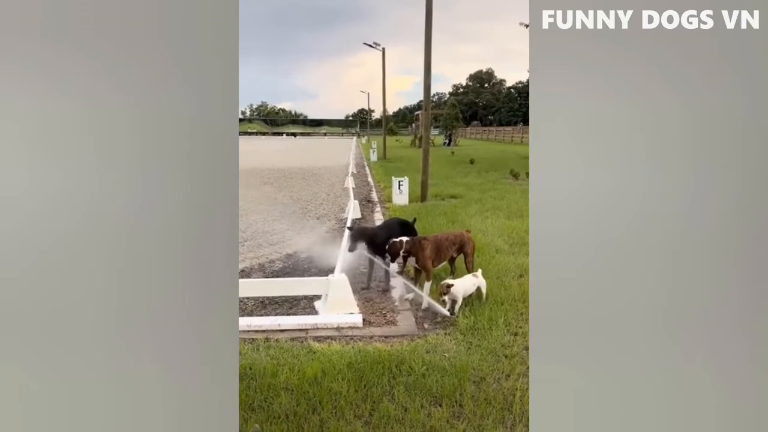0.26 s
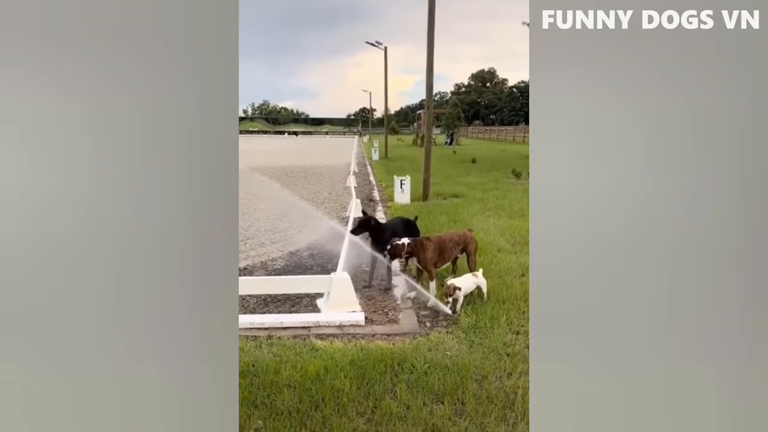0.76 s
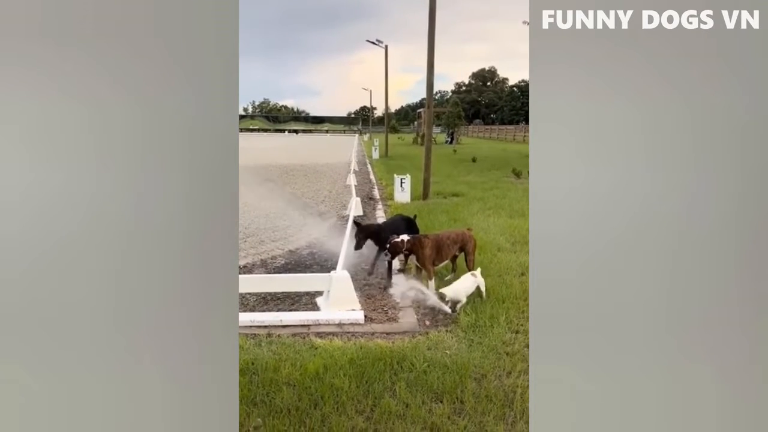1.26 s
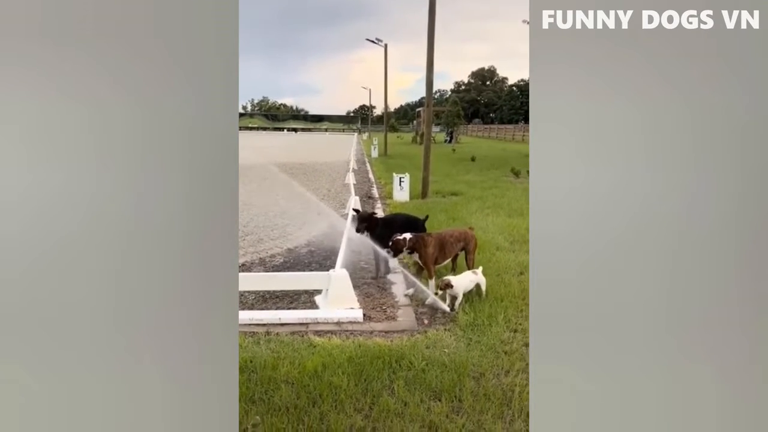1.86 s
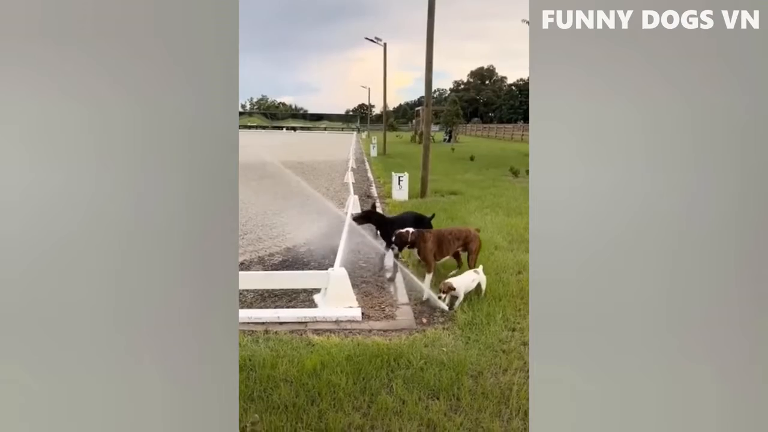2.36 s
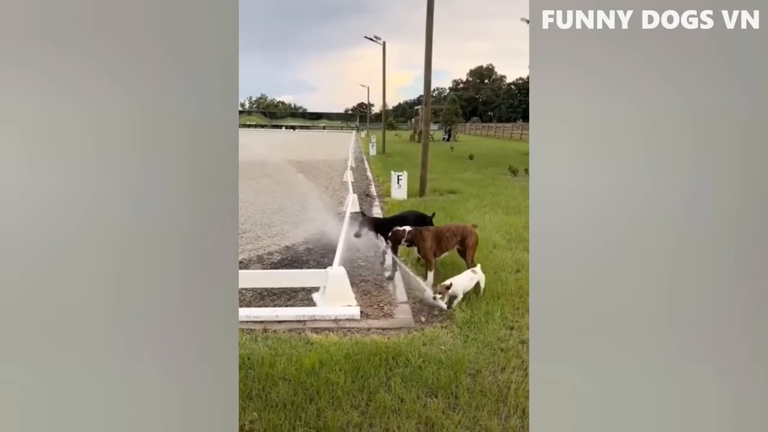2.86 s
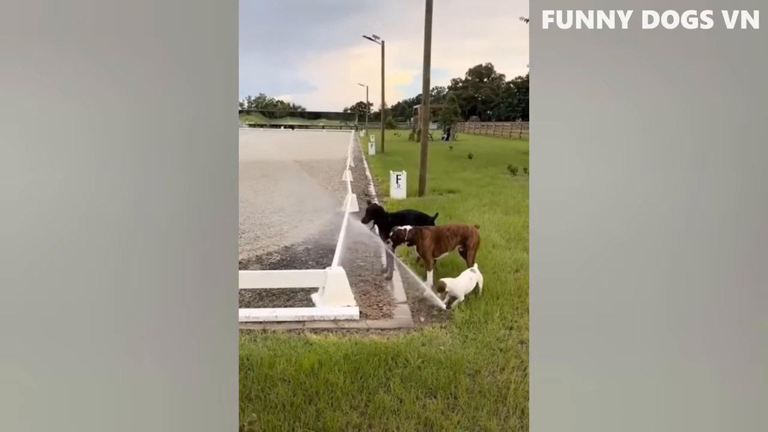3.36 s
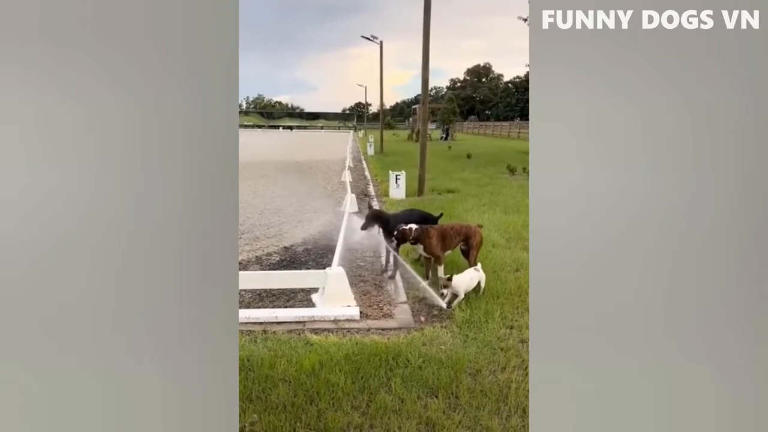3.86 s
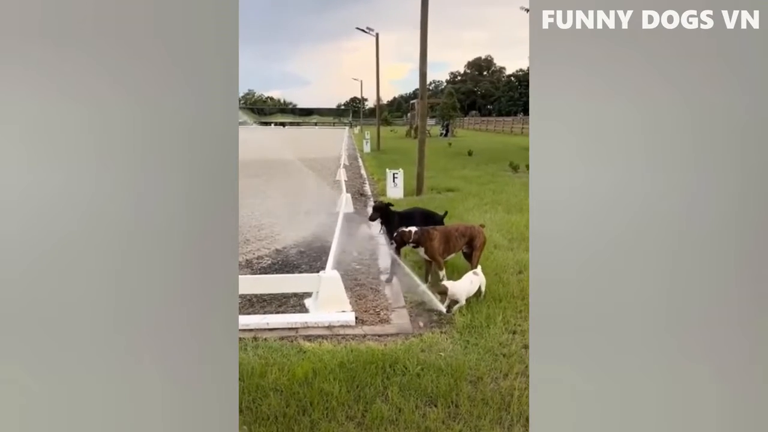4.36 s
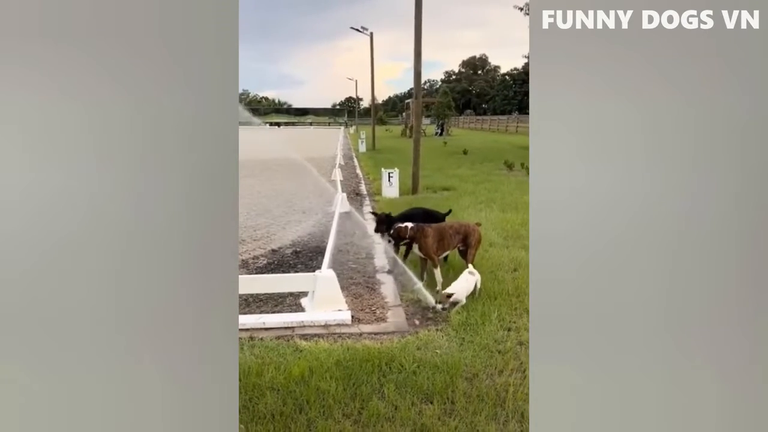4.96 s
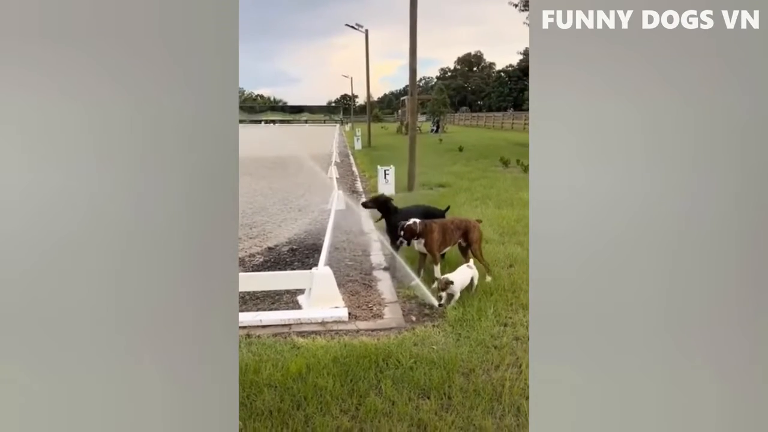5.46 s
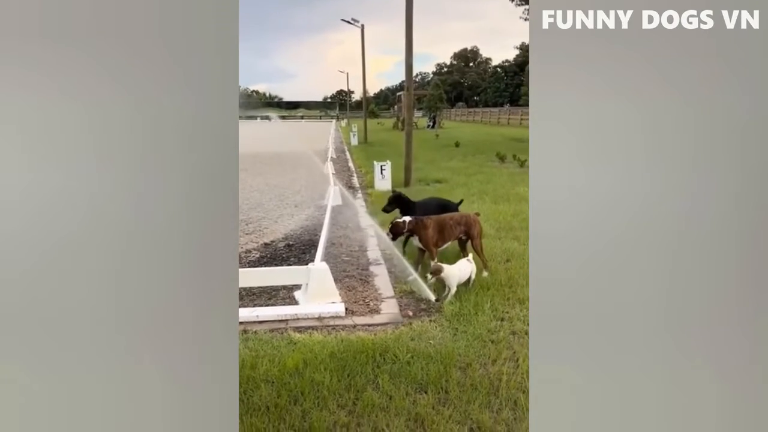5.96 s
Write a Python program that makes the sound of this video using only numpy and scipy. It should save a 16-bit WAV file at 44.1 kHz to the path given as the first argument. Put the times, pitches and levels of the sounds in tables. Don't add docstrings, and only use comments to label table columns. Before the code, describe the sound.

Outdoors on a lawn, a sprinkler a few metres from a phone spits irregular rasping bursts of water. Soon dogs bite the jet, turning the hiss into hollow, mouth-shaped gushes. Sharp slaps, fine sprays and small gulped bubbles crowd in between. Low distant traffic and soft falling spray continue underneath. Near the end come a long bite, a muffled gush, a faint deep paw thump and a final bright burst. The treble is thin and brittle, with small whistles.

```python
import sys
import numpy as np
from scipy import signal
from scipy.fft import rfft, irfft, next_fast_len
from scipy.io import wavfile
from scipy.ndimage import uniform_filter1d, map_coordinates

SR = 44100
rng = np.random.default_rng(int(sys.argv[2]) if len(sys.argv) > 2 else 0)


def inscribe(sig):
    pcm = np.round(np.clip(np.atleast_2d(sig).T, -1, 1) * 32767)
    wavfile.write(sys.argv[1], SR, pcm.astype(np.int16))


def ratio(d):
    e = np.asarray(d, float) / 20
    return 10 ** e


N = 274081
HOP = 32


def unit(x):
    return x / np.sqrt(np.mean(x ** 2) + 1e-20)


def along(points, hz):
    f, v = np.transpose(points)
    return np.interp(np.log(hz + 1), np.log(f + 1), v)


def wobble(rate):
    knots = rng.standard_normal(int(N * rate / SR) + 4)
    return map_coordinates(knots, [np.arange(N) * rate / SR])


def filtered(x, response):
    m = next_fast_len(N + 8192)
    return irfft(rfft(x, m) * response(np.fft.rfftfreq(m, 1 / SR)), m)[..., :N]


def colour(points):
    return lambda hz: ratio(along(points, hz))


def rush(gain, alike, patchy_db, spiky_db):
    drops = ratio(spiky_db * uniform_filter1d(rng.standard_normal(N), size=9) * 3)
    z = signal.stft(rng.standard_normal((2, N)) * drops, nperseg=256)[2]
    patches = uniform_filter1d(rng.standard_normal(z.shape[1:]), size=2, axis=0)
    patches = uniform_filter1d(patches, size=14, axis=1)
    pair = signal.istft(z * ratio(patchy_db * unit(patches)), nperseg=256)[1][:, :N]

    def mid_side_gain(hz):
        spread = np.arccos(np.clip(along(alike, hz), -1, .97)) / 2
        return gain(hz) * [np.cos(spread), np.sin(spread)]

    mid, side = filtered(pair, mid_side_gain)
    return unit(np.array([mid + side, mid - side]))


# f/Hz, level/dB [per Hz]
DISTANT = [(18, -41), (38, -10.5), (56, -2.5), (92, -3.5), (125, -7.5), (240, -10), (450, -20), (900, -21),
           (1500, -24), (3400, -22), (3900, -19), (5700, -22), (6300, -64)]
# f/Hz, level/dB [per Hz]
MIST = [(5700, -60), (6100, -3.5), (8000, -1.5), (11000, -2), (13000, 2.5), (15300, 0), (16200, -80)]
# f/Hz, likeness [0-1]
FAR_ALIKE = [(60, 0.92), (180, 0.95), (550, 0.82), (1650, 0.76), (4970, 0.096), (15000, 0.15)]
# t/s, level/dB
PASSING = [(0, 1), (1.1, .5), (1.8, 0.5), (2.5, 0.5), (4.2, 1), (4.8, 0), (5.1, -3), (5.45, 2.5),
           (5.75, -1.5), (6.21, 0.5)]


def distance():
    swell_db = np.interp(np.arange(N) / SR, *np.transpose(PASSING))
    far = ratio(-42 + swell_db) * rush(colour(DISTANT), FAR_ALIKE, patchy_db=1.82, spiky_db=1.5)
    mist_db = -45.5 + 1.2 * swell_db + 0.54 * wobble(4.3)
    return far + ratio(mist_db) * rush(colour(MIST), FAR_ALIKE, patchy_db=-0.5, spiky_db=3.5)


# t/s, f/Hz, level/dB, t60 [s]
GULPS = [
    (.738, 206, -44.5, 0.054),
    (1.063, 183, -35, 0.058),
    (1.38, 285, -35.5, 0.033),
    (3.563, 366, -34, 0.046),
    (4.09, 790, -32, 0.099),
    (4.65, 700, -50, .05),
    (5.673, 1650, -38, 0.038),
    (5.857, 62, -41.5, 0.21),
]


def gulps():
    out, t = np.zeros(N + SR), np.arange(SR // 5) / SR
    for s, hz, db, t60 in GULPS:
        ring = np.sin(2 * np.pi * hz * t * (1 + 0.117 * t / t60))
        ring = ring * (1 - np.exp(-t / 0.0033))
        out[round(s * SR):][:len(t)] += ratio(db + 12.5 - 60 * t / t60) * ring
    return out[:N]


# t/s, peak level/dB, low body level/dB
SLAPS = [(0.7297, -41, -25), (1.4444, -15, -21), (1.5989, -15, -35), (1.6442, -18, -26), (1.9346, -38, -26),
         (2.338, -31, -14), (2.489, -26, -26), (2.804, -27, -22), (2.9433, -26, -9), (3.1764, -22, -26),
         (3.2037, -17, -27), (3.5, -31, -27), (3.6174, -26.5, -18), (4, -24, -15), (4.2994, -31, -23),
         (4.8543, -24, -19), (5.2464, -26, -21), (5.913, -22, -31), (6.032, -32, -24)]


def slaps():
    out, t = np.zeros(N + SR), np.arange(2000) / SR
    for s, db, low_db in SLAPS:
        burst = rng.standard_normal((2, len(t)))
        spatter = ratio(-60 * t / 0.0075) * burst[0]
        body = 3 * ratio(low_db - 60 * t / 0.014) * uniform_filter1d(burst[1], size=16)
        out[round(s * SR):][:len(t)] += ratio(db - 5.5) * (spatter + body)
    return filtered(out[:N], colour([(100, 5), (300, 2.7), (5000, 5.4), (15000, 6.9)]))


# start t/s, end t/s, f/Hz, width [Hz], level/dB
CAVITIES = [(.37, 0.596, 1030, 258, -33.5), (0.491, 0.655, 1880, 320, -33), (0.424, .56, 2830, 500, -31.5),
            (0.169, 0.262, 3270, 700, -35.5), (1.441, 1.502, 1110, 200, -34.5),
            (1.445, 1.548, 5260, 600, -37), (1.648, 1.733, 2570, 250, -41), (2.336, 2.514, 1730, 260, -37),
            (2.353, 2.519, 2550, 220, -34), (2.823, 2.896, 3430, 350, -47), (3.103, 3.17, 1100, 180, -34),
            (3.292, 3.314, 2530, 250, -32), (3.498, 3.557, 1700, 250, -38), (3.878, 3.955, 1097, 150, -36),
            (4.019, 4.137, 920, 380, -43), (4.231, 4.327, 2890, 300, -32), (5.243, 5.277, 1580, 250, -37),
            (5.428, 5.52, 1050, 420, -32), (5.472, 5.53, 3040, 250, -37), (5.668, 5.724, 510, 596, -38.5),
            (5.69, 5.83, 3370, 70, -56), (5.716, 5.798, 2750, 70, -52), (5.698, 5.827, 1720, 405, -51)]


def cavities():
    out, sputter = np.zeros((2, N)), ratio(1.5 * wobble(30))
    for start, end, hz, width_hz, db in CAVITIES:
        n = round((end - start) * SR)
        f = np.fft.rfftfreq(n, 1 / SR)
        resonance = (f * width_hz / (hz * hz - f * f + 1j * f * width_hz)) ** 1.7
        spray = rng.standard_normal((2, 16000))[:, :n]
        ring = irfft(rfft(spray) * resonance, n)
        mid, side = unit(ring) * signal.windows.tukey(n, .35) * [[1], [.2]]
        out[:, round(start * SR):][:, :n] += ratio(db) * np.array([mid + side, mid - side])
    return out * sputter


# f/Hz, width [Hz], level/dB
MOUTH = [(700, 300, -4.5), (1015, 310, 0.5), (1760, 440, -1), (2730, 260, -6.5)]


def mouth(f):
    total = 0
    for k, (centre, width, db) in enumerate(MOUTH):
        band = 1j * f * width
        total = total + (-1) ** k * ratio(db) * band / (centre * centre - f * f + band)
    return total


def contacts(rows, release_db, crown_db, drain_db, fizz_db, grow_db):
    s, hold_ms, db, rise_ms, hollow_db = np.transpose(rows)[..., None]
    hold, rise = np.maximum(hold_ms, 1) / 1000, np.maximum(rise_ms, 6) / 1000
    since = np.arange(0, N, HOP) / SR - s
    inside = np.clip(since, 0, hold + .05)
    crown = crown_db * np.sin(np.pi * np.clip(since / hold, 0, 1))
    climb = 20 * np.minimum(since, 0) / rise
    level = db + crown + climb - release_db * np.maximum(since - hold, 0)
    hollow = level + hollow_db - drain_db * inside
    fizz = level + fizz_db + grow_db * inside - 0.28 * (db + 29.5)
    return np.sum(ratio([level, hollow, fizz]) ** 2, axis=1)


# f/Hz, level/dB [per Hz]
SPLASH = [(90, -51), (250, -12), (500, -11.5), (900, -14), (1500, -13.5), (2500, -2.5), (3500, -1),
          (4200, -4), (5000, 0), (5900, -9), (6300, -65)]
# f/Hz, level/dB [per Hz]
FIZZ = [(5700, -60), (6100, -2.5), (8000, 3), (9400, 1.5), (11000, -7), (12500, -0.5), (13500, -5),
        (15300, -2), (15700, -28), (16200, -80)]
# f/Hz, likeness [0-1]
NEAR_ALIKE = [(60, 1.0), (180, 1), (550, 0.96), (1650, 0.93), (4970, 0.67), (15000, 0.17)]
# t/s, hold [ms], level/dB, rise [ms], hollow level/dB
CUTS = [(0.177, 76, -31, 20, -4.5), (0.725, 6, -43.5, 7, -4.5), (1.45, 74, -26, 76, -7.5),
        (1.584, 30, -32, 14, -4), (1.936, 3.4, -33.5, 77, -7.5), (2.169, 14, -33, 130, -6),
        (2.22, 48.6, -26, 46, -7.5), (2.81, 78.6, -27.5, 19, -3.5), (3.123, 75.6, -23.5, 53, -1.5),
        (3.502, 56, -27, 13, -6.5), (3.89, 50.5, -24.5, 32, -4.5), (3.997, 8, -36, 7, -6),
        (4.355, 22, -36.5, 12, -8), (4.532, 36.4, -24.5, 43, -7.5), (4.862, 45.5, -29, 30, -3.5),
        (5.178, 9.1, -53.5, 30, -11), (5.249, 70, -30, 16, -5.5), (5.912, 69, -27.5, 15, -6),
        (6.029, 6, -34.5, 16, -4.5)]
# t/s, hold [ms], level/dB, rise [ms], hollow level/dB
BITES = [
    (0.419, 144, -31, 110, 1),
    (0.585, 68, -33, 40, 0),
    (2.339, 152, -32, 17, 1),
    (3.289, 62, -32.5, 16, -4),
    (4.022, 148, -29.5, 25, -1.5),
    (4.226, 73, -25, 170, -7.5),
    (5.367, 154, -30.5, 12, -4.5),
]
# t/s, hold [ms], level/dB, rise [ms], hollow level/dB
TOUCHES = [(0.282, 16, -35, 67, -4), (0.888, 37, -38.5, 200, -6.5), (1.009, 140, -47.0, 60, 2.5),
           (1.21, 63, -39, 100, -2), (1.377, 26, -33.5, 41, -2.5), (1.634, 60, -31.5, 16, -3),
           (1.98, 85, -50, 54, -5), (2.94, 13, -29.5, 11, -4.5), (3.252, 7, -36.5, 13, -8),
           (3.616, 10, -39.5, 8.3, -5), (5.523, 37, -36, 8, -6.5)]
# t/s, hold [ms], level/dB, rise [ms], hollow level/dB
GUSHES = [
    (4.65, 16, -51, 30, 4.5),
    (5.681, 11, -37.5, 17, -5),
]
# t/s, hold [ms], level/dB, rise [ms], hollow level/dB
FANS = [
    (1.475, 27, -36, 40, -15),
    (2.13, 46, -44.5, 35, -15),
    (3.335, 25, -42, 30, -15),
    (4.36, 12, -40, 16, -15),
    (4.98, 17, -55, 46, -15),
    (5.94, 24, -34, 30, -15),
]


def jet():
    power = ratio(-55.5 + np.array([[0], [-2], [3.5]])) ** 2
    power = power + contacts(CUTS, release_db=450, crown_db=1, drain_db=107, fizz_db=-4.5, grow_db=36)
    power += contacts(BITES, release_db=438, crown_db=0.5, drain_db=5, fizz_db=-2, grow_db=-6)
    power += contacts(TOUCHES, release_db=273, crown_db=-0.8, drain_db=28, fizz_db=-2, grow_db=-13)
    power += contacts(GUSHES, release_db=276, crown_db=-3, drain_db=30, fizz_db=-27, grow_db=3)
    power += contacts(FANS, release_db=380, crown_db=.6, drain_db=30, fizz_db=3.6, grow_db=3)
    splash, hollow, fizz = [np.interp(np.arange(N), np.arange(0, N, HOP), np.sqrt(p)) for p in power]
    splash = splash * rush(colour(SPLASH), NEAR_ALIKE, patchy_db=2.4, spiky_db=1.5)
    hollow = np.roll(hollow, round(0.0065 * SR))
    hollow = hollow * ratio(-1.5) * rush(mouth, NEAR_ALIKE, patchy_db=2.54, spiky_db=2.1)
    fizz = fizz * ratio(4.0) * rush(colour(FIZZ), NEAR_ALIKE, patchy_db=2.5, spiky_db=1.0)
    fizz = fizz * ratio([[-.4], [.4]])
    return ratio(0.71 * wobble(45)) * (splash + hollow + fizz)


def scene():
    return distance() + gulps() + slaps() + cavities() + jet()


def steps(shape, size):
    coarse = rng.standard_normal((shape[0] // size[0] + 1, shape[1] // size[1] + 1))
    coarse = uniform_filter1d(coarse, size=3, axis=1)
    return np.kron(unit(coarse), np.ones(size))[:shape[0], :shape[1]]


def contrast(v):
    around = uniform_filter1d(abs(v), size=15, axis=0)
    return v * (abs(v) / (around + 1e-9)) ** 0.18


# low f/Hz, high f/Hz, odds
GAPS = [(5700, 6280, 2), (9390, 9740, 1.1), (9950, 10600, .4), (11280, 11780, 1.5), (15410, SR, 9)]
# filter-bank channel, level/dB [above its band], left-right level/dB, phase lead [rad]
WHISTLES = [(28, -3.5, -10, 0.25), (32, -5, -19, 0), (40, -1.2, 0, -1.6), (44, 4, 0, -1.5)]
# low f/Hz, high f/Hz
STANDS_FOR = [(9480, 10150), (11400, 11750), (13200, 14450), (15000, 15600)]
# low f/Hz, high f/Hz, odds
EMPTIES = [(9900, 10600, .9), (9900, 11500, 2), (13170, 14420, 1.5), (14420, 15250, 1)]
# start t/s, end t/s
WHISTLING = [
    [(.12, 1.35), (1.42, 1.9), (2.0, 3.47), (3.88, 4.8), (5.26, 5.88)],
    [(.2, .86), (.94, 1.33), (1.48, 1.57), (3.33, 3.47), (4.15, 4.8), (5.4, 5.87)],
    [(.95, 1.17), (1.5, 1.56), (1.67, 1.87), (2.25, 2.86), (2.95, 3.08), (3.32, 3.45), (3.9, 4.34),
     (4.41, 4.55), (5.38, 5.83)],
    [(0, .22), (.42, .77), (.93, 1.32), (1.65, 1.87), (2.24, 2.31), (3.17, 3.46), (4.15, 4.8), (5.3, 5.87),
     (5.93, 6.03)],
]
# f/Hz, odds
SIDE_DROPPED = [(0, 4), (280, 6), (340, -3), (1000, -1), (1500, 0.46), (2800, 1.13), (3600, -0.75),
                (6000, -2.5)]


def brittle_treble(x):
    hz, t, z = signal.stft(x, SR, nperseg=1024, noverlap=768)
    keep, tones, now = np.ones(z.shape[1:]), np.zeros_like(x), np.arange(N) / SR
    treble = uniform_filter1d(np.sum(abs(z[:, hz > 6400]) ** 2, axis=(0, 1)), size=3)
    sudden = np.roll(treble, -2) > ratio(2 * 7) * np.roll(treble, 2)
    sharp = uniform_filter1d(1. * sudden, size=5) > 1e-6
    edge = hz[:, None] + 40 * steps(keep.shape, size=(12, 4))
    chance = steps(keep.shape, size=(5, 4))
    for lo, hi, odds in GAPS:
        keep[(edge > lo) & (edge < hi) & (chance < odds)] = ratio(-65)
    for whistle, band, emptied, spans in zip(WHISTLES, STANDS_FOR, EMPTIES, WHISTLING):
        channel, db, pan_db, lead = whistle
        lo, hi = band
        low, high, odds = emptied
        band_power = np.sum(abs(z[:, (hz > lo) & (hz < hi)]) ** 2, axis=(0, 1))
        size = np.sqrt(uniform_filter1d(band_power, size=5))
        on = sum((t > a) & (t < b) for a, b in spans) > 0
        keep[(edge > low) & (edge < high) & on & (chance < odds)] = ratio(-60)
        whistle_hz = (round(channel) + .5) * SR / 128
        phase = 2 * np.pi * whistle_hz * now + np.array([[lead], [0]])
        pan = ratio(np.array([[pan_db / 2], [-pan_db / 2]]))
        tones += np.interp(now, t, size * on * ratio(db)) * pan * np.sin(phase)
    keep[:, sharp] = np.maximum(keep[:, sharp], ratio(-17) * (hz < 15750)[:, None])
    mid, side = (z[0] + z[1]) / 2, (z[0] - z[1]) / 2
    dropped = along(SIDE_DROPPED, hz)[:, None] > steps(keep.shape, size=(8, 8))
    mid, side = contrast(mid), contrast(side * np.where(dropped, ratio(-27.0), 1))
    pair = np.array([mid + side, mid - side]) * keep
    return signal.istft(pair, SR, nperseg=1024, noverlap=768)[1][:, :N] + tones


def low_pass(x):
    return signal.sosfilt(signal.butter(12, 16750, fs=SR, output="sos"), x)


def record(dry):
    mix = brittle_treble(dry)
    return low_pass(mix)


dry = scene()
out = record(dry)
inscribe(out)
```